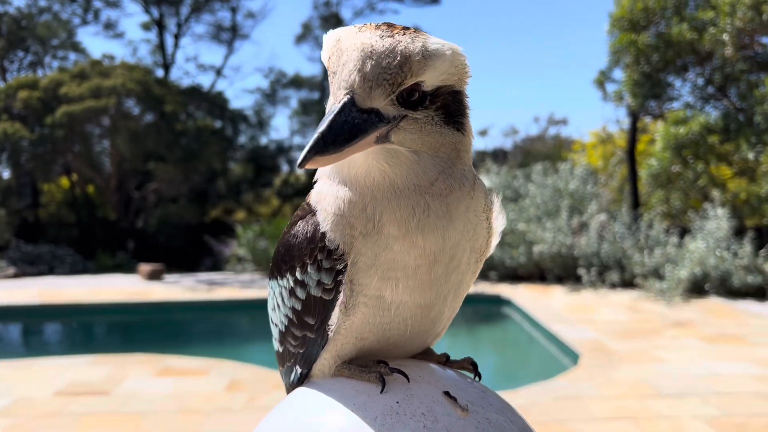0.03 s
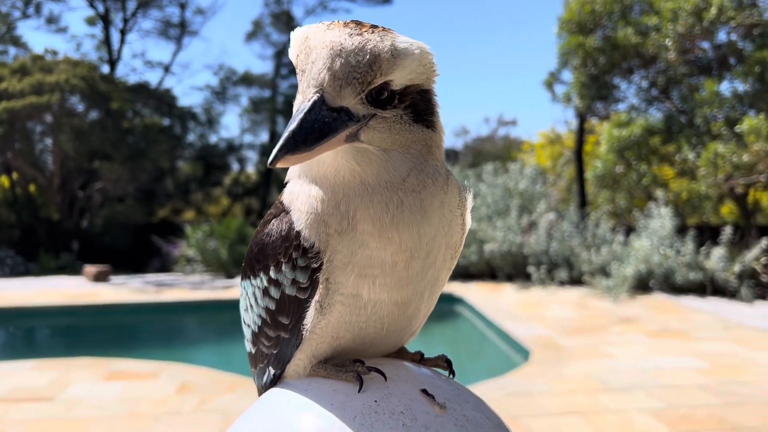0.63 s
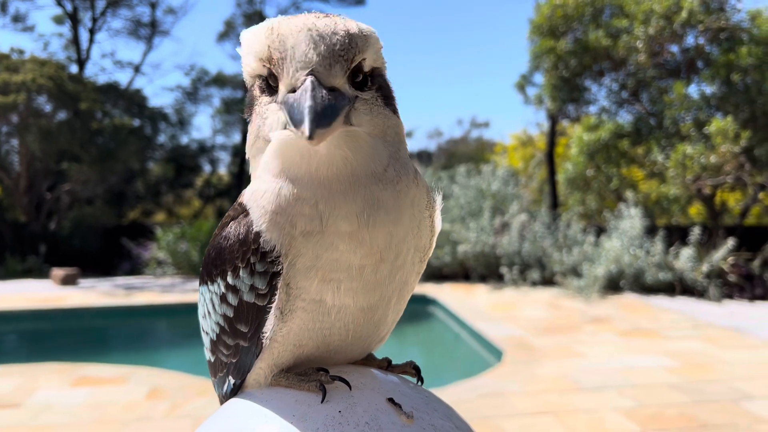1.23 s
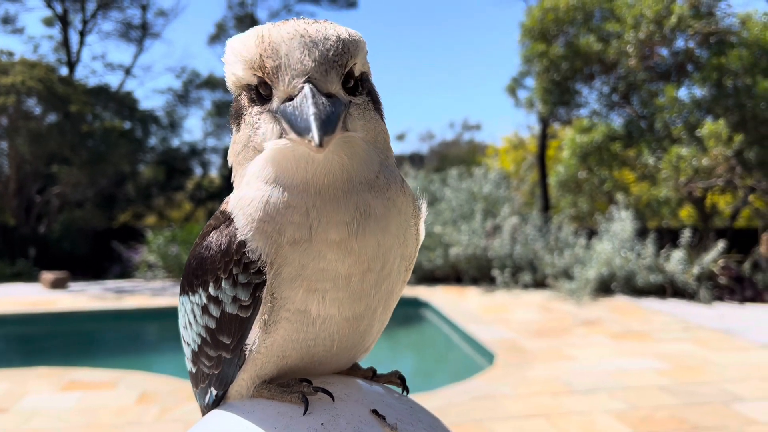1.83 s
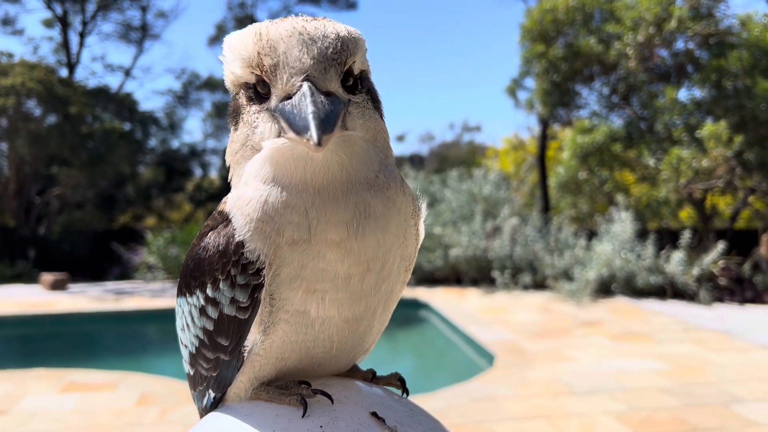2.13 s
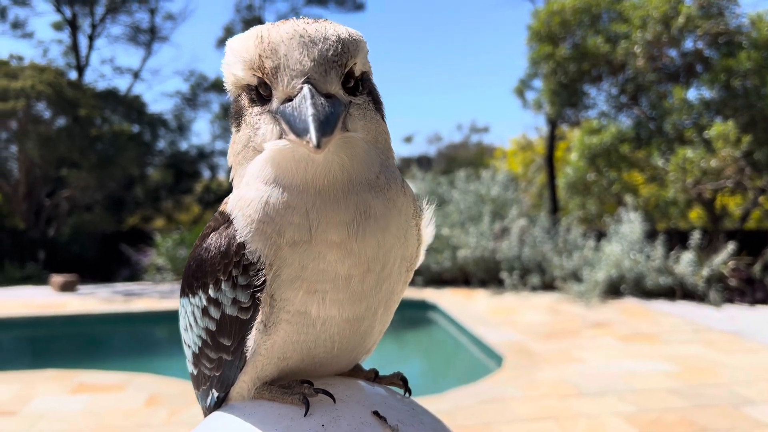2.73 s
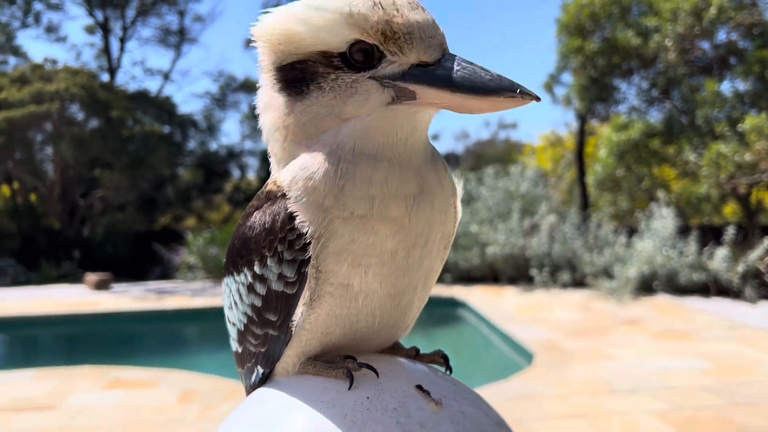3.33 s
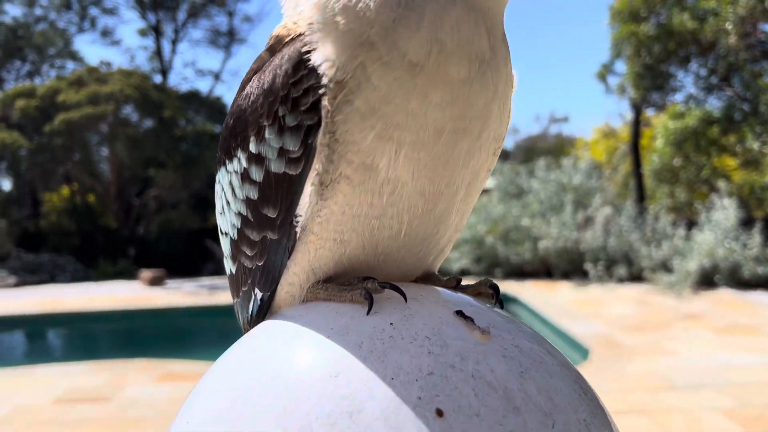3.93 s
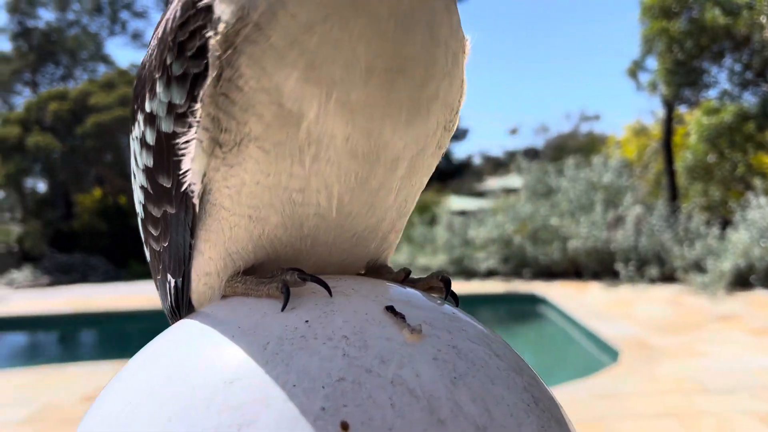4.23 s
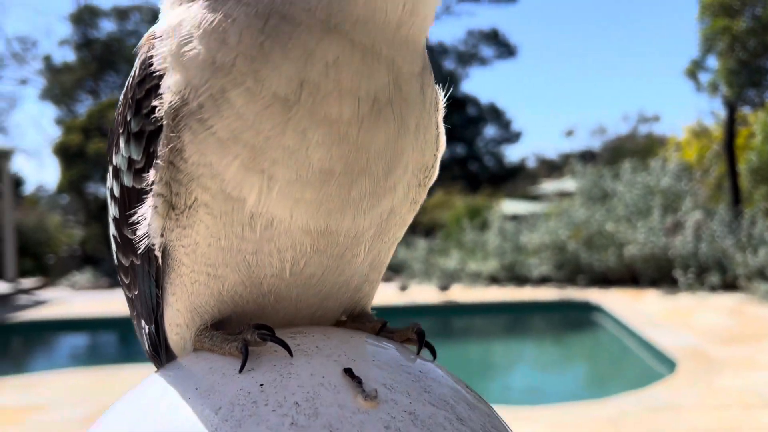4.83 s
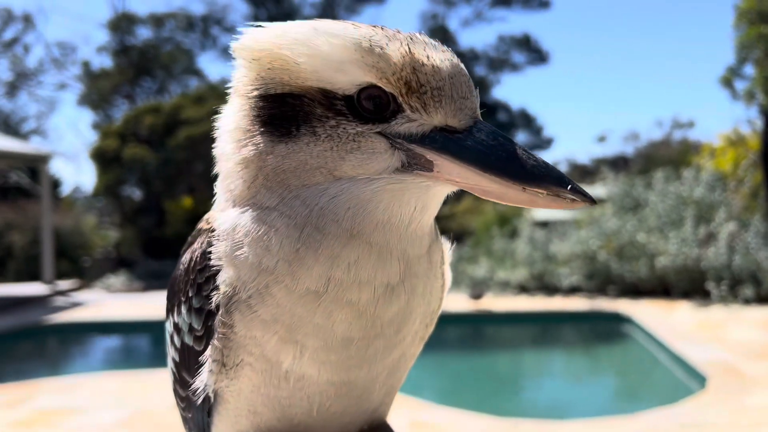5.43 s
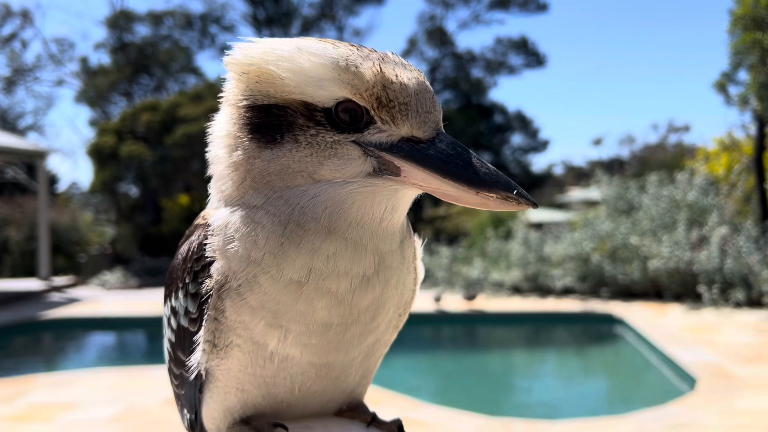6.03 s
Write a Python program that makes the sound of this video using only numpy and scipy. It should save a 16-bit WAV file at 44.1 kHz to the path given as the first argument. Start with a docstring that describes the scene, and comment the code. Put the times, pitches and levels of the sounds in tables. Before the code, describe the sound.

A nearby kookaburra growls hoarsely twice in a garden, after faint chirps, light wind on the microphone and a distant engine drone.

```python
"""A kookaburra close by, at a garden pool, gives two long rasping growls, each led in by a soft coo
and cut off by a squawk. The membranes of its syrinx slap unevenly and excite the resonances of its
throat; in the coos and squawks they vibrate periodically and give a harmonic series.
Small birds chirp and whistle in the trees, and the garden echoes the voices.
A distant engine drones under it all, and light wind bumps the microphone."""
import sys
import numpy as np
from scipy import signal
from scipy.fft import rfft, irfft, next_fast_len
from scipy.io import wavfile
from scipy.ndimage import uniform_filter1d

SR = 44100
rng = np.random.default_rng(int(sys.argv[2]) if len(sys.argv) > 2 else 0)


def dump_mix(stems):
    """Bounce the given channels to the path in sys.argv[1] as a 16-bit WAV at rate SR."""
    frames = np.atleast_2d(stems).T  # one column per channel
    limited = np.clip(frames, -1, 1)  # hard clip at full scale
    pcm = np.round(limited * 32767).astype(np.int16)
    wavfile.write(sys.argv[1], SR, pcm)


N = 267863
TIME = np.arange(N) / SR
FFT_SIZE = next_fast_len(N, True)
BIN_HZ = np.fft.rfftfreq(FFT_SIZE, 1 / SR)

# The two growls. Each row: start and end in seconds.
GROWL_SPANS = [(4, 5.089), (5.263, 6.032)]
# How hard the bird pushes, one table a growl. Each row: time in seconds, effort in dB.
GROWL_EFFORT = [
    [(4.0, -52.5), (4.09, -45), (4.18, -41), (4.24, -30), (4.38, -27), (4.5, -28), (4.54, -23.5),
     (4.64, -26), (5.1, -22.5)],
    [(5.28, -24.5), (5.335, -30), (5.41, -23.5), (5.82, -21.5), (5.93, -25), (6.04, -24)],
]
# Brief surges, louder and harsher. Each row: time in seconds, extra effort in dB.
EFFORT_SURGES = [(4.17, 1), (4.253, 3), (4.38, 3.5), (4.452, 4.5), (4.675, 4), (4.772, 3.5), (4.789, 5.5),
                 (4.862, 3), (5.012, 3), (5.481, 3.5), (5.703, 4.5), (5.829, 3.5)]
# Instants when the airflow catches. Each row: time and half length in seconds.
FLOW_CATCHES = [(4.2625, .004), (4.297, 0.0018), (4.317, 0.0023), (4.336, 0.0024), (4.37, 0.0022),
                (4.4, .0045), (4.439, .0025), (4.459, .003), (4.482, 0.0015), (4.51, 0.0076), (4.626, .003),
                (4.65, 0.002), (4.665, .0018), (4.759, 0.0021), (4.782, 0.0014), (4.804, 0.0027),
                (4.839, 0.0016), (4.967, 0.0029), (5.017, 0.002), (5.032, 0.0023), (5.07, 0.0054),
                (5.301, 0.0013), (5.373, 0.0018), (5.463, 0.0024), (5.53, 0.0012), (5.569, 0.0015),
                (5.612, 0.00088), (5.632, .002), (5.663, 0.0016), (5.779, 0.0017), (5.879, 0.0029),
                (5.918, 0.0015), (5.944, 0.0014), (5.974, .003)]
# The throat opens wide in the first growl, then narrows.
# Each row: time in seconds, lower resonance in Hz, opening from 0 to 1.
THROAT_SHAPE = [(4.07, 775, 0.2), (4.18, 908, 0.76), (4.55, 1046, 0.9), (4.7, 1058, 0.51),
                (4.85, 1078, 0.29), (5.08, 1000, 0.01), (5.28, 971, 0), (5.5, 987, 0.07),
                (6.04, 1028, 0.06)]
# Strength of the upper resonance. Each row: opening from 0 to 1, level in dB relative to effort.
UPPER_RING_LEVEL = [(0, -6), (.58, -4), (.78, -14.5)]
# Spectra of the rasp, throat open and narrowed. Each row: frequency in Hz, relative level in dB.
OPEN_RASP = [(900, -23), (1350, 3), (2300, 0), (3300, -1), (4350, -13), (4750, -10.5), (5400, -24),
             (15500, -30.5)]
NARROW_RASP = [(1800, -26.5), (2500, -2.5), (3300, 3), (4300, -29), (5400, -25.5), (6100, -12.5),
               (8000, -28.5)]
# Hiss on top of the growl. Each row: time in seconds, main resonance in Hz, then the levels of
# that resonance and of the higher modes in dB relative to effort.
HISS_TRACK = [(4.08, 6470, -39, -41), (4.19, 6270, -26, -47), (4.37, 6250, -23.5, -26.5),
              (4.66, 6560, -26.5, -31.5), (4.79, 7470, -42, -31.5), (4.93, 7180, -29.5, -34.5),
              (5.25, 6710, -35, -44), (6.04, 7000, -31, -37)]
# Higher modes of the hiss. Each row: rest frequency and width in Hz, open and narrowed gain in dB.
HIGH_MODES = [(9230, 440, -1.5, 2.5), (11440, 1000, -7, 4.5), (13100, 670, -0.5, -6.5),
              (14800, 1100, -7, -15)]
# Coos, one table each. Each row: time in seconds, pitch in Hz, level of the fundamental in dB,
# second harmonic in dB relative to it, fall per further harmonic in dB.
COO_NOTES = [
    [(3.908, 485, -41, 5, 19), (3.925, 582.6, -40.5, -9.5, 13), (3.99, 643, -34.5, -15, 16.5),
     (4.025, 626, -35, -17, 15), (4.078, 623, -38.5, -26, 13.5)],
    [(5.213, 612, -45.5, -2.5, 16), (5.24, 668, -52.5, -12, 17), (5.264, 675, -42, 7.5, 20.5)],
]
# Closing squawks. Each row: start and length in seconds, first and last pitch in Hz, level in dB.
SQUAWK_GLIDES = [(5.091, 0.0057, 940, 855, -23), (5.098, .012, 803, 463, -24),
                 (6.0324, .0085, 847, 797, -21.5)]
# Response of the throat in a squawk. Each row: frequency in Hz, relative gain in dB.
SQUAWK_RESPONSE = [(500, -8), (1550, 0.5), (2400, -22), (3300, -20), (4400, -45.5)]
# Phase difference between the two channels, which spreads the kookaburra's voice in stereo.
# Each row: frequency in Hz, left minus right in radians.
CHANNEL_PHASE = [(400, 0.94), (1100, 0.3), (2500, 1.15), (4200, 1.5), (6000, 1.64), (8200, -0.1),
                 (9000, -2.5), (11400, -2.5), (12400, -6)]
# Level difference between the channels for that voice. Each row: frequency in Hz, left minus right in dB.
CHANNEL_BALANCE = [(1000, -0.6), (1450, -3), (3600, -1), (5000, 2), (7100, -1)]

# Rising chirps. Each row: start in seconds, base level in dB, pitch factor.
CHIRP_EVENTS = [(1.381, -42.5, 0.99), (2.246, -42, 1), (3.403, -44.5, 1.02), (4.691, -40, 0.98)]
# A chirp's two voices; the second joins near the top. Rows as for the coos, with time counted
# from the chirp's start and level added to its base level.
CHIRP_FIRST_VOICE = [(0, 1983, -28.5, -8.5, 20), (.014, 2100, -12.5, 3.5, 8.5), (.028, 2455, -8, 5, 13),
                     (.04, 2679, -5.5, 3.5, 12.5), (.051, 2850, -6, -8.5, 14), (.066, 2770, -21.5, -29, 15)]
CHIRP_SECOND_VOICE = [(.038, 3520, -7, -13.5, 39), (0.068, 3660, -13, -18, 11)]
# Treble colour of the chirps. Each row: frequency in Hz, gain in dB.
CHIRP_RESPONSE = [(8400, -0.5), (9500, -11.5), (13000, 19), (15500, 6.5)]
# Whistles from the left, one table each. Rows as for the coos.
WHISTLE_NOTES = [
    [(1.555, 2600, -68, 7, 18), (1.569, 2690, -68, 17.4, 26), (1.58, 2510, -58.5, 10, 23),
     (1.613, 2790, -70, 23, 28), (1.628, 2690, -63, 15.5, 28), (1.646, 2900, -72, 5, 20)],
    [(3.565, 2900, -71, -11, 13), (3.605, 3220, -65.5, -4, 22), (3.645, 3310, -61, -3.5, 25),
     (3.688, 2780, -73, 7.5, 20)],
    [(4.005, 2640, -83, 11, 24.9), (4.048, 2640, -82, 13, 25)],
]
# Hoarse partials opening the first whistle. Each row: frequency and width in Hz, level in dB.
HOARSE_PARTIALS = [(2560, 410, -65), (3680, 590, -64.5), (5100, 1100, -61)]
# A whistle's fundamental spreads into the trees more than its overtones do.
# Each row: frequency in Hz, gain into the echo in dB.
WHISTLE_SCATTER = [(3300, 2.5), (5000, -8)]
# Reverberation of the garden. Each row: frequency in Hz, time to fall 60 dB in seconds.
GARDEN_T60 = [(300, 0.099), (2800, 0.42), (5500, 0.43), (15000, 0.33)]

# Wind bumps. Each row: time in seconds, level in dB, pitch in Hz, half length in seconds.
WIND_BUMPS = [(0.467, -36, 89, 0.016), (0.746, -32.5, 88.5, 0.011), (0.802, -28.5, 109, 0.011),
              (1.082, -26, 113, 0.0079), (2.264, -27.5, 95, 0.022), (2.334, -24.5, 87, 0.007),
              (2.441, -25.5, 152, 0.011), (2.456, -23, 83.4, 0.0075), (5.077, -21.5, 117, 0.0061),
              (5.095, -23, 69, .012)]
# Faint dry ticks. Each row: start in seconds, relative level in dB.
DRY_TICKS = [(1.2935, -52), (2.7606, -52)]
# Gusts that swell and die evenly. Each row: peak time in seconds, level in dB, half length in seconds.
WIND_GUSTS = [(0.46, -45, 0.23), (2.417, -41, 0.15), (3.072, -41, 0.036), (3.322, -38, 0.087),
              (4.64, -36.5, 0.14), (4.955, -32, 0.12), (5.76, -44.5, 0.34)]
# Spectra of wind rumble and garden air. Each row: frequency in Hz, relative density in dB.
WIND_SPECTRUM = [(28, -29), (45, -1.5), (62, 3), (115, -0.5), (200, -21), (600, -38), (1500, -75)]
AIR_SPECTRUM = [(25, -48.5), (130, -10), (250, -14.5), (420, -19.5), (900, -24), (1500, -34), (3000, -45.5),
                (4200, -49.5), (5600, -45), (6800, -50.5), (9500, -67), (12500, -63.5), (15500, -63.5)]
# Likeness of those noises in the two channels. Each row: frequency in Hz, correlation from 0 to 1.
NOISE_CORRELATION = [(100, 0.81), (300, 0.31), (1200, 0.024)]
# Loudness of the engine's drone. Each row: time in seconds, relative level in dB.
DRONE_LEVEL = [(0, -60), (1.6, -50), (1.85, -38), (2.25, -35), (2.6, -44.5), (3.3, -35.5), (3.6, -52),
               (3.85, -34.5), (4.5, -39.5), (6.07, -39.5)]
# Faint engine overtones. Each row: frequency and width in Hz, peak level in dB, peak time in seconds.
ENGINE_WHINES = [(150.9, 18.5, -48, 5.1), (376.7, 24, -63, 1.7), (449, 33, -57.5, 3.47)]


def kookaburra(echo_db=-24, paving_db=-20, paving_s=0.012, coo_roughness=.35):
    """Superposition: the voice arrives directly, by reflection off the paving and as garden echo."""
    shake = 1 + coo_roughness * wander(600) * growl_gate()  # the rattle modulates an overlapping coo
    voice = growl() + squawks() + shake * coos()
    left = np.exp(.5j * read(CHANNEL_PHASE, BIN_HZ)) * amp(read(CHANNEL_BALANCE, BIN_HZ) / 2)
    direct = irfft(rfft(voice, FFT_SIZE) * np.array([left, 1 / left]), FFT_SIZE)[:, :N]
    bounce = place(np.roll(voice, round(paving_s * SR)), lead_ms=-0.36, balance_db=-4.0)
    return direct + amp(paving_db) * bounce + amp(echo_db) * garden_echo(voice)


def growl(idle_db=-41, full_db=-25, idle_slaps_per_s=185, full_slaps_per_s=430, surge_half_s=0.0059):
    """Source and filter: slaps of the syrinx, faster and louder with effort, excite the throat."""
    surge = sum(db * np.exp(-np.minimum(((TIME - s) / surge_half_s) ** 2, 20))
                for s, db in EFFORT_SURGES)
    steady_db = curves(GROWL_EFFORT[0] + GROWL_EFFORT[1])[0]
    effort_db = steady_db + surge + 0.73 * wander(150)
    lower_hz, opening = curves(THROAT_SHAPE)
    slap_rate = np.interp(steady_db, [idle_db, full_db], [idle_slaps_per_s, full_slaps_per_s])
    ringing = np.clip((slap_rate - 245) / 105, 0, 1)  # 0 for dry clicks, 1 for a sustained ring
    drive = syrinx(slap_rate, opening)
    lower = lower_resonance(drive, lower_hz, ringing)
    upper = upper_resonance(drive, opening, ringing)
    throat = lower + upper + rasp(drive, opening, ringing, surge) + hiss(drive, opening)
    chest_db = -41 + .25 * (effort_db - full_db)  # the low body hardly grows with effort
    chest = amp(chest_db) * hold_level(band(drive, 349, 755, order=2))
    return airflow() * (amp(effort_db) * throat + chest)


def syrinx(slap_rate, opening, jitter=.44, spread_db=5, puff_s=0.00085):
    """Aperiodic pulse train: each membrane slap frees a puff of air, larger in an open throat."""
    cycles = np.cumsum(slap_rate * np.exp(jitter * wander(420))) / SR
    slaps = np.diff(np.floor(cycles), prepend=0) * amp(spread_db * np.tanh(wander(900)))
    puffs = signal.lfilter([1], [1, -np.exp(-1 / (puff_s * SR))], slaps) * rng.standard_normal(N)
    return slaps + (0.099 + 0.06 * opening) * puffs


def lower_resonance(drive, hz, ringing, ring_width_hz=45, click_width_hz=550):
    """Damped resonance: slow slaps give dry clicks, fast ones keep it ringing almost steadily."""
    ring = hold_level(band(resonate(drive, hz, ring_width_hz), 787, 1410, order=2), size=700)
    click = hold_level(band(resonate(drive, hz, click_width_hz), 400, 1000, order=2))
    return ringing * amp(-0.65) * ring + (1 - ringing) * amp(-1) * click


def upper_resonance(drive, opening, ringing, shut_hz=1610, open_rise_hz=760, idle_sag_hz=330):
    """Cavity tuning: this resonance rises as the throat opens; a broad skirt extends it downward."""
    hz = shut_hz + open_rise_hz * opening - idle_sag_hz * (1 - ringing)
    db = ringing * np.interp(opening, *np.transpose(UPPER_RING_LEVEL)) - 5 * (1 - ringing)
    peak = resonate(drive, hz, width_hz=230)
    skirted = resonate(peak, 0.87 * hz, width_hz=1150, stages=3)
    return amp(db) * hold_level(skirted, size=1000)


def rasp(drive, opening, ringing, surge_db, shut_db=-27, open_gain_db=24):
    """Broadband filtering: the throat colours the slaps and lets more rasp out as it opens."""
    harshness_db = 0.25 * surge_db * (1 - opening)
    dry_db = (1 - ringing) * (-8 + 19 * opening)
    coloured = opening * colour(drive, OPEN_RASP) + (1 - opening) * colour(drive, NARROW_RASP)
    db = shut_db + open_gain_db * opening + harshness_db + dry_db
    return amp(db) * hold_level(coloured, size=1400)


def hiss(drive, opening, main_rest_hz=7100, glide_exponent=.55):
    """Modal excitation: high resonances slide together; an open throat damps the main one more."""
    hz, main_db, top_db = curves(HISS_TRACK)
    narrowed = resonate(drive, hz, width_hz=800, stages=2)
    opened = resonate(drive, hz, width_hz=1100, stages=2)
    out = amp(main_db) * hold_level((1 - opening) * narrowed + opening * opened)
    for rest_hz, width_hz, open_db, narrow_db in HIGH_MODES:
        mode_hz = rest_hz * (hz / main_rest_hz) ** glide_exponent * (1 + 0.0087 * wander(26))
        mode_db = top_db + narrow_db + (open_db - narrow_db) * opening
        out += amp(mode_db) * hold_level(resonate(drive, mode_hz, width_hz, stages=2))
    return out


def airflow(catch_depth=0.87):
    """Amplitude modulation: each catch cuts most of the growl's airflow for an instant."""
    flow = growl_gate()
    for s, half_s in FLOW_CATCHES:
        flow *= 1 - catch_depth * np.exp(-np.minimum(((TIME - s) / half_s) ** 2, 10) ** 2)
    return flow


def growl_gate():
    """Gating: 1 during a growl, 0 elsewhere."""
    return sum(gate(start, end) for start, end in GROWL_SPANS)


def coos():
    """Periodic vibration: a soft, low harmonic note leads into each growl."""
    return sum(note(rows, jitter=0.0066, shimmer=0.15, rate=170) for rows in COO_NOTES)


def squawks():
    """Harmonic filtering: the membranes lock into a falling pitch; the throat weights its partials."""
    out = np.zeros(N)
    for s, length_s, first_hz, last_hz, db in SQUAWK_GLIDES:
        hz = np.linspace(first_hz, last_hz, round(length_s * SR))
        phase = 2 * np.pi * np.cumsum(hz) / SR
        harmonics = sum(amp(read(SQUAWK_RESPONSE, k * hz)) * np.cos(k * phase) for k in range(1, 10))
        add(out, s, amp(db) * unit(harmonics) * signal.windows.tukey(len(hz), .5))
    return out


def chirps(echo_db=-6):
    """Biphonation: two rising voices, both wavering fast, make a small bird's harsh chirp."""
    voices = np.zeros(N)
    for s, db, factor in CHIRP_EVENTS:
        for shape in (CHIRP_FIRST_VOICE, CHIRP_SECOND_VOICE):
            rows = [(s + t, hz * factor, db + rise, second, fall) for t, hz, rise, second, fall in shape]
            voices += note(rows, jitter=0.03, shimmer=0.43, rate=1000, harmonics=6)
    voices = colour(voices, CHIRP_RESPONSE)
    return place(voices, lead_ms=.45, balance_db=4.5) + amp(echo_db) * garden_echo(voices)


def whistles(gain_db=-1, hoarse_span_s=(1.527, 1.574)):
    """Nearly periodic vibration: purer notes, the first begun hoarsely on narrow bands of noise."""
    notes = sum(note(rows, jitter=0.012, shimmer=0.17, rate=650, harmonics=4) for rows in WHISTLE_NOTES)
    hoarse = sum(amp(db) * narrow_noise(hz, width) for hz, width, db in HOARSE_PARTIALS)
    voice = amp(gain_db) * (notes + gate(*hoarse_span_s, edge_s=.008) * hoarse)
    return place(voice, lead_ms=0, balance_db=20) + garden_echo(colour(voice, WHISTLE_SCATTER))


def note(rows, jitter, shimmer, rate, harmonics=5):
    """Harmonic series of a bird's note: jitter modulates its pitch, shimmer its amplitude."""
    s, *columns = np.transpose(rows)
    t = np.arange(s[0], s[-1], 1 / SR)
    hz, db, second_db, fall_db = (np.interp(t, s, c) for c in columns)
    phase = 2 * np.pi * np.cumsum(hz * (1 + jitter * wander(rate, len(t)))) / SR
    overtones = sum(amp(second_db - k * fall_db) * np.sin((k + 2) * phase) for k in range(harmonics - 1))
    envelope = amp(db) * (1 + shimmer * wander(rate, len(t))) * signal.windows.tukey(len(t), .15)
    out = np.zeros(N)
    add(out, s[0], np.sqrt(2) * envelope * (np.sin(phase) + overtones))
    return out


def garden_echo(x, size=32768, echoes_per_s=2500):
    """Reverberation: paving, fence and trees scatter echoes that decay fastest in the bass."""
    taps = rng.standard_normal((2, size)) * (rng.random((2, size)) < echoes_per_s / SR)
    hz, t, spectra = signal.stft(taps, SR, nperseg=256)
    decay = amp(-60 * t / read(GARDEN_T60, hz)[:, None])
    tail = signal.istft(spectra * decay, SR, nperseg=256)[1]
    return signal.fftconvolve(x[None], tail / np.linalg.norm(tail[0]), axes=1)[:, :N]


def wind_bumps(core_db=-10):
    """Pressure pulses: air pushes on the microphone, each push with a shorter core an octave up."""
    out = np.zeros(N)
    t = np.arange(-SR // 10, SR // 10) / SR
    for s, db, hz, half_s in WIND_BUMPS:
        push, core = (np.exp(-abs(k * t / half_s) ** 4.8) * np.cos(2 * np.pi * (k * hz * t + rng.random()))
                      for k in (1, 2))
        add(out, s + t[0], amp(db) * (push + amp(core_db) * core))
    return out


def ticks(gain_db=-2, decay_s=0.00094):
    """Exponential decay: tiny bursts of bright noise are heard as dry ticks."""
    out = np.zeros(N)
    t = np.arange(SR // 5) / SR
    for s, db in DRY_TICKS:
        burst = rng.standard_normal(len(t)) * np.exp(-t / decay_s)
        add(out, s, amp(db + gain_db) * band(burst, 1800, 12000, order=1))
    return out


def engine(drone_hz=109.6, drone_gain_db=-4.5, swell_s=2.9):
    """Frequency and amplitude modulation: a far engine's note wavers under swelling, noisy whines."""
    phase = 2 * np.pi * np.cumsum(drone_hz * (1 + 0.01745 * wander(10))) / SR
    drone = np.sqrt(2) * np.sin(phase) * (1 + 0.45 * wander(25))
    out = amp(curves(DRONE_LEVEL)[0] + drone_gain_db) * drone
    for hz, width_hz, db, s in ENGINE_WHINES:
        swell = amp(db) / (1 + ((TIME - s) / swell_s) ** 2)
        out += swell * narrow_noise(hz * (1 + 0.017 * wander(2.46)), width_hz)
    return out


def wind_rumble(calm_db=-49):
    """Addition of powers: gusts and a steady breeze together set the level of a low rumble."""
    gust_power = sum(amp(db) ** 2 * np.exp(-((TIME - s) / half_s) ** 2) for s, db, half_s in WIND_GUSTS)
    return np.sqrt(amp(calm_db) ** 2 + gust_power) * stereo_noise(WIND_SPECTRUM, 30, 90)


def garden_air(level_db=-56.5):
    """Stationary noise: the even hush of the garden."""
    return amp(level_db) * stereo_noise(AIR_SPECTRUM, 300, 1500)


def stereo_noise(spectrum, lo_hz, hi_hz):
    """Partial coherence: channels alike in the bass, their mean of rms 1 in the given band."""
    left, other = rfft(rng.standard_normal((2, N)), FFT_SIZE) * amp(read(spectrum, BIN_HZ))
    likeness = read(NOISE_CORRELATION, BIN_HZ)
    pair = np.array([left, likeness * left + np.sqrt(1 - likeness ** 2) * other])
    in_band = irfft(pair.mean(0) * (BIN_HZ > lo_hz) * (BIN_HZ < hi_hz), FFT_SIZE)
    return irfft(pair, FFT_SIZE)[:, :N] / np.std(in_band)


def narrow_noise(hz, width_hz):
    """Narrow-band noise of rms 1 from one steep resonance."""
    return unit(resonate(rng.standard_normal(N), hz, width_hz, stages=2))


def resonate(x, hz, width_hz, stages=1):
    """Resonance of gain 1 that follows hz; more stages make it steeper."""
    carrier = np.exp(2j * np.pi * np.cumsum(hz * np.ones(N)) / SR)
    pole = np.exp(-np.pi * width_hz / SR)
    baseband = signal.lfilter([(1 - pole) ** stages], np.poly([pole] * stages), x * carrier.conj() + 1e-18)
    return 2 * (carrier * baseband).real


def band(x, lo_hz, hi_hz, order=3):
    """Band-pass filter."""
    return signal.sosfilt(signal.butter(order, [lo_hz, hi_hz], "band", fs=SR, output="sos"), x)


def colour(x, spectrum, size=2048):
    """Minimum-phase filter with the given spectrum."""
    log_gain = np.log(amp(read(spectrum, abs(np.fft.fftfreq(size, 1 / SR)))))
    impulse_response = np.fft.ifft(np.exp(np.conj(signal.hilbert(log_gain)))).real
    return signal.oaconvolve(x, impulse_response)[:N]


def hold_level(x, size=2400):
    """Division by the running rms: holds the slow level at 1 and keeps the fast grain."""
    power = uniform_filter1d(uniform_filter1d(x ** 2, size), size)
    return x / np.sqrt(abs(power) + 1e-12)


def place(x, lead_ms, balance_db):
    """Direction by time and level difference: the left leads and is louder by these amounts."""
    delayed = np.roll(x, round(lead_ms * SR / 1000))
    return np.array([x * amp(balance_db / 2), delayed * amp(-balance_db / 2)])


def wander(rate, size=N):
    """Random modulation of rms 1, through rate new values a second."""
    knots = np.arange(size) * rate / SR
    return unit(np.interp(knots, np.arange(20000), rng.standard_normal(20000)))


def gate(start, end, edge_s=0.0015):
    """Trapezoidal window, open from start to end."""
    return np.clip(np.minimum(TIME - start, end - TIME) / edge_s + .5, 0, 1)


def curves(rows):
    """Linear interpolation of a table's columns over time."""
    s, *columns = np.transpose(rows)
    return [np.interp(TIME, s, c) for c in columns]


def read(points, hz):
    """Interpolation of a spectrum on a log-frequency axis."""
    point_hz, value = np.transpose(points)
    return np.interp(np.log(hz + 1), np.log(point_hz + 1), value)


def add(mix, s, sound):
    """Superposition of a sound on the mix, from s seconds."""
    part = mix[max(round(s * SR), 0):][:len(sound)]
    part += sound[:len(part)]


def amp(db):
    """Decibels to amplitude ratio."""
    return np.exp(np.asarray(db) * (np.log(10) / 20))


def unit(x):
    """Normalisation to rms 1."""
    return x / np.sqrt(np.mean(x ** 2) + 1e-20)


def scene():
    """Superposition of birds and background in two channels, the background a shade to the right."""
    birds = kookaburra() + chirps() + whistles()
    background = wind_bumps() + ticks() + engine() + wind_rumble() + garden_air()
    return birds + background * amp([[-.3], [.3]])


def record(dry, cutoff_hz=15700):
    """Band limiting: a steep low-pass filter removes the highest treble."""
    low_pass = signal.firwin(511, cutoff_hz, window=("kaiser", 9), fs=SR)
    return signal.oaconvolve(dry, low_pass[None], "same")


dry = scene()
out = record(dry)
dump_mix(out)
```